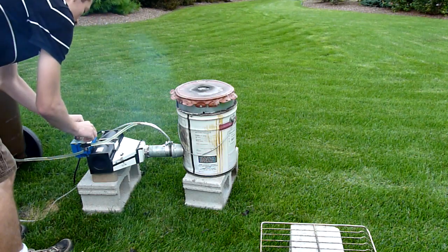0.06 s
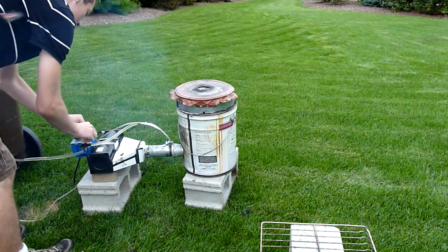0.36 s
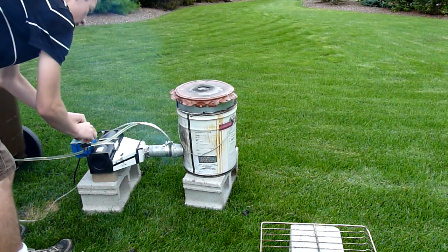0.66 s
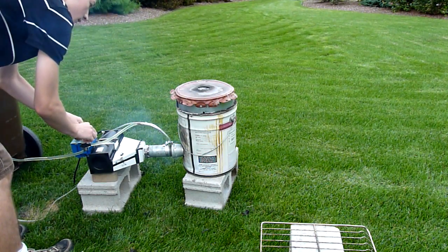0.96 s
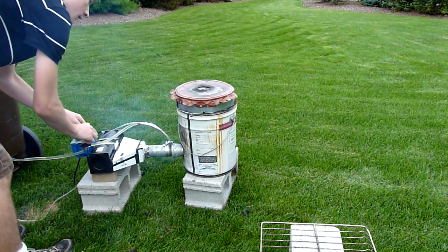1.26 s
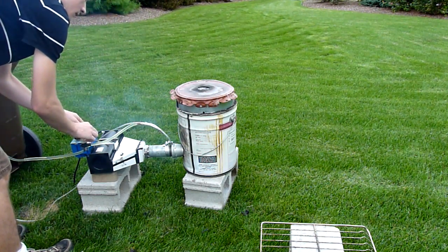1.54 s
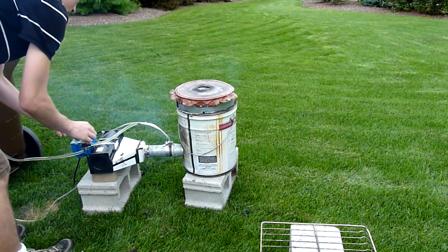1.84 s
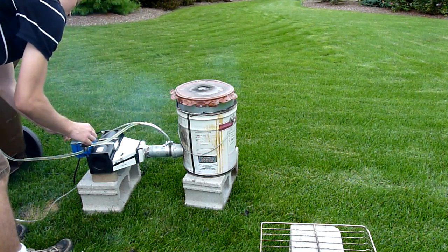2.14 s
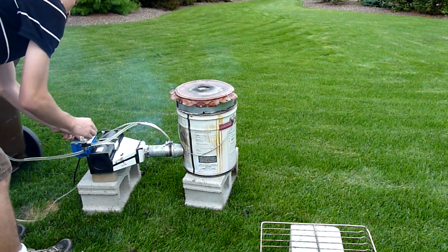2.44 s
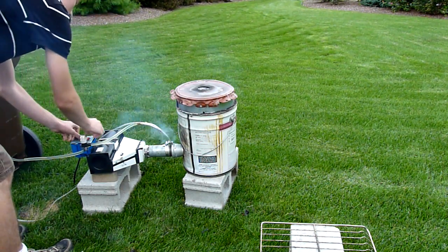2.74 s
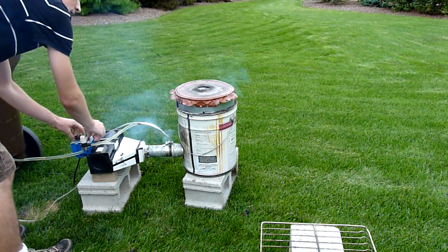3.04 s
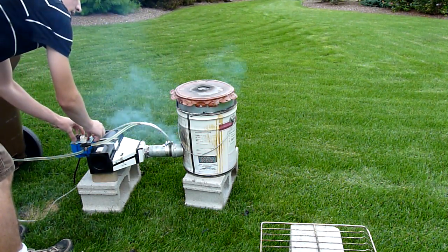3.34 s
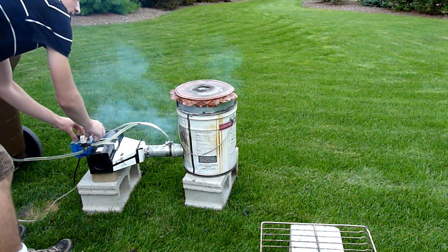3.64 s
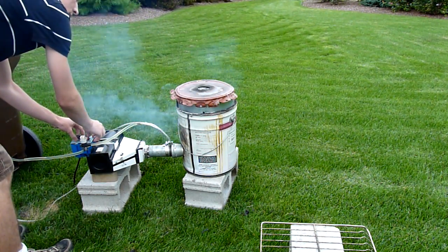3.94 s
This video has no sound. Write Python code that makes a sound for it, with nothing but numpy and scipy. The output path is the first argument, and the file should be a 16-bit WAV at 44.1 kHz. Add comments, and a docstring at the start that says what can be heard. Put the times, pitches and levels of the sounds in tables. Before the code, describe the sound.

A burner flame flutters in uneven low surges inside a small furnace, over a blower's steady rush and a spitting hiss. Fuel catches with two separate hard thumps, then three in quick succession. Heard outdoors from a couple of metres.

```python
"""A blower-fed burner fires into a small home-made furnace on a lawn, a couple of metres away.
From the start the flame flutters in uneven low surges over the blower's steady rush, while the air
tube rings hollowly and the nozzle hisses and spits. Pockets of fuel catch with a hard thump at 1.2 s
and again near 1.9 s, where the surges peak; the flame eases, then thumps three times around 3.4 s.
Throughout, the recorder adds a faint ring at 3-4 kHz and cuts three narrow bands out of the sound."""
import sys
import numpy as np
from scipy import signal
from scipy.fft import rfft, irfft
from scipy.io import wavfile
from scipy.ndimage import uniform_filter1d, map_coordinates

SR = 44100
rng = np.random.default_rng(int(sys.argv[2]) if len(sys.argv) > 2 else 0)


def materialize(psi):
    """Save the field psi as 16-bit PCM at rate SR to the path in sys.argv[1].

    A 1-D psi becomes a single channel; in a 2-D psi each row is a channel.
    """
    bounded = np.clip(np.atleast_2d(psi).T, -1, 1)
    quanta = np.round(bounded * 32767).astype(np.int16)
    wavfile.write(sys.argv[1], SR, quanta)


N = 176400
TIME = np.arange(N) / SR
FREQS = np.arange(N // 2 + 1) * SR / N

# resonances of the blower housing (centre [Hz], width [Hz], boost [dB])
HOUSING_MODES = [(1346, 26, 7), (1395, 100, 5), (1585, 50, 5), (2175, 100, 7), (2340, 70, 4),
                 (5360, 150, 4), (5560, 80, 5), (6640, 170, 5)]


def undb(db):
    """Decibels to gain."""
    return 10 ** (np.asarray(db) / 20)


def ride(points):
    """A fader ride: straight lines in dB between (time, level) points."""
    return np.interp(TIME, *np.array(points).T)


def walk(rate):
    """Smooth random wobble of spread 1 that changes about rate times a second."""
    y = map_coordinates(rng.standard_normal(N // 20), [TIME * rate], order=3, mode="wrap")
    return y / y.std()


def resonances(peaks):
    """Boost in dB that a set of resonances gives at each frequency."""
    return sum(db / (1 + (2 * (FREQS - hz) / width) ** 2) for hz, width, db in peaks)


def noise(spectrum, peaks=()):
    """Noise of rms 1 with a smooth spectrum and resonances on top."""
    f = FREQS + 1e-6
    hz, db = np.array(spectrum, float).T
    colour = undb(np.interp(np.log(f), np.log(hz), db) + resonances(peaks))
    roll_off = np.minimum(f / hz[0], 1) ** 2 * np.minimum(hz[-1] / f, 1) ** 2
    y = irfft(rfft(rng.standard_normal(N)) * colour * roll_off, N)
    return y / y.std()


def band(hz, width_hz, size=N):
    """Two unrelated noises of rms 1 in a bell-shaped band."""
    f = np.arange(size // 2 + 1) * SR / size
    bell = 1 / (1 + (1.4 * (f - hz) / width_hz) ** 2)
    y = irfft(rfft(rng.standard_normal((2, size))) * bell, size)
    return y / y.std()


def puffs(table):
    """Short swells of hiss, each in its own band, as two unrelated signals."""
    size = 8192
    out = np.zeros((2, N + 2 * size))
    t = (np.arange(size) - size // 2) / SR
    for at, length, hz, width, db in table:
        start = int(at * SR) + size // 2
        out[:, start:start + size] += undb(db) * band(hz, width, size) * np.exp(-2 * (t / length) ** 2)
    return out[:, size:size + N]


def spread(mid, side):
    """Left and right from mid and side."""
    return np.array([mid + side, mid - side])


def ports(mid, side, likeness):
    """Hiss is only partly alike at the two ports, louder and a trace later on the left."""
    pan_db, lag_s = 5.5, 1.7e-5
    left, right = spread(np.sqrt((1 + likeness) / 2) * mid, np.sqrt((1 - likeness) / 2) * side)
    left = irfft(rfft(left) * np.exp(-2j * np.pi * FREQS * lag_s), N)
    return np.array([left * undb(pan_db / 2), right * undb(-pan_db / 2)])


def blower():
    """The bed: air rushes evenly through the ringing housing, with a light flutter."""
    # tone of the rush in the centre (frequency [Hz], relative level [dB])
    mid_spectrum = [(60, 14.5), (200, -14), (450, 6), (545, 1), (640, 5), (950, 2.5), (1200, -3.5),
                    (1550, -6.5), (1720, -10), (2000, -12), (2350, -12.5), (3000, -19.5), (4300, -14.5),
                    (5400, -10.5), (6300, -11.5), (7500, -17), (9000, -17), (15500, -31)]
    # tone of the diffuse air that gives it width (frequency [Hz], relative level [dB])
    side_spectrum = [(20, -5), (60, -5), (130, -17), (280, -7), (600, -3.5), (1000, -1.5), (1500, -3.5),
                     (2100, -9), (3000, -7), (4200, -6.5), (5400, -16), (6500, -16), (8000, -15)]
    # slow drift of the rush (time [s], gain [dB])
    drift = [(0, -1), (.8, 1), (1.25, -0.5), (1.45, 1), (1.9, 0), (2.05, 0), (2.8, 0), (3.2, 0.5), (4, 1.5)]
    flutter_db, flutter_hz = 1.3, 21.78
    air = spread(undb(-44.5) * noise(mid_spectrum, HOUSING_MODES), undb(-59) * noise(side_spectrum))
    return air * undb(ride(drift) + flutter_db * walk(flutter_hz))


def air_tube():
    """The air tube's resonances give a hollow ring that swells and fades."""
    # resonances of the tube (centre [Hz], width [Hz], relative level [dB])
    modes = [(1357, 92, -3), (1423, 77, -5), (1565, 110, -4.5)]
    # swell of the ring (time [s], level [dB])
    swell = [(0, -56.5), (.35, -52.5), (.56, -59), (.95, -55), (1.07, -49), (1.25, -58.5), (1.42, -49),
             (1.72, -57), (1.86, -49), (2.05, -62.5), (3.3, -58.5), (3.68, -54.5), (4, -59)]
    ring = sum(undb(db) * band(hz, width)[0] for hz, width, db in modes)
    return ring / ring.std() * undb(ride(swell))


def sizzles():
    """A fine fry at the nozzle: tiny puffs scattered in time, pitch and level."""
    per_s, length_s, width_hz = 100, .02, 300
    low_hz, high_hz, typical_db, scatter_db = 9000, 15500, -59, 5
    when, pitch, strength = rng.random((int(per_s * N / SR), 3)).T
    centres = low_hz + pitch * (high_hz - low_hz)
    levels = typical_db + scatter_db * (2 * strength - 1)
    return puffs((at, length_s, hz, width_hz, db) for at, hz, db in zip(when * N / SR, centres, levels))


def nozzle():
    """The top end: the jet's flickering hiss, wavering whistles and sputtering spurts."""
    # tone of the steady hiss (frequency [Hz], relative level [dB])
    hiss_spectrum = [(2000, -28), (3300, -9.5), (4100, -8), (4800, -40), (6200, -8.5), (7200, -8.5),
                     (8300, -6), (9100, -6.5), (10200, -6), (11500, -2), (12300, -5.5), (12900, 2.5),
                     (13700, 1), (15500, -3.5)]
    # faint ringing at 3-4 kHz, maybe the recorder's own noise, and higher peaks; all of them ring in the hiss
    # and its spurts (centre [Hz], width [Hz], boost [dB])
    peaks = [(3120, 90, 6), (3674, 60, 10), (3808, 55, 10), (4026, 55, 10), (7200, 200, 6), (8637, 80, 5),
             (9060, 130, 5), (9786, 130, 8), (10309, 80, 4), (10600, 150, 5), (11430, 80, 5),
             (12900, 120, 3), (13600, 150, 3), (14658, 60, 4)]
    # drift and brief dips of the hiss (time [s], gain [dB])
    drift = [(0, 0.5), (.49, 1), (.53, 1), (.57, 0.5), (2.6, 2), (2.745, 1), (2.775, -3), (2.87, 0.5),
             (2.99, 1.5), (3.04, -1.5), (3.1, 1.5), (3.55, 2), (4, -0.5)]
    # a faint whistling edge that holds, then dies away (time [s], level [dB])
    edge_fade = [(0, -60), (1.6, -57.5), (4, -97)]
    # faint whistles of the jet (centre [Hz], width [Hz], level [dB])
    whistle_bands = [(6620, 130, -65.5), (9950, 120, -66), (10660, 160, -64.5)]
    # spurts of hiss (time [s], length [s], centre [Hz], width [Hz], relative level [dB])
    spurt_cues = [(.217, 0.015, 12600, 5000, -40), (.22, .02, 6200, 2000, -46.5),
                  (.47, 0.037, 12000, 4000, -47), (.51, 0.035, 5500, 4000, -50),
                  (.757, 0.032, 11400, 1100, -41.5), (.877, 0.016, 13200, 2500, -40),
                  (.99, .012, 12500, 4000, -52), (1.035, 0.0097, 11100, 4000, -42),
                  (1.094, .028, 11400, 1000, -47), (1.15, .03, 14400, 1300, -46),
                  (1.441, 0.016, 12500, 4000, -42), (1.498, 0.018, 11200, 1300, -45),
                  (1.519, 0.02, 13600, 3200, -40), (1.594, 0.016, 13000, 4500, -43),
                  (1.70, 0.02, 13800, 1500, -42), (1.92, 0.096, 6400, 1700, -50),
                  (1.95, 0.017, 11600, 1800, -42), (2.012, 0.02, 13000, 3500, -42.5),
                  (2.10, 0.027, 11200, 700, -47), (2.31, .012, 13500, 4000, -41),
                  (2.345, .035, 14800, 1800, -45), (2.378, 0.016, 10600, 700, -48.5),
                  (2.348, 0.04, 11400, 800, -45), (2.531, 0.02, 13700, 1800, -39.5),
                  (2.59, 0.024, 14200, 2500, -41), (2.645, 0.03, 9700, 1200, -50),
                  (2.738, .022, 13000, 4000, -44), (3.09, 0.031, 14200, 1500, -40),
                  (3.486, 0.018, 14200, 2000, -40), (3.58, 0.035, 8300, 4000, -48),
                  (3.755, 0.03, 12500, 4040, -45)]
    flicker_db, flicker_hz = 1.45, 60
    waver_db, waver_hz = 2.5, 14
    spurt_gain_db, sputter_db, sputter_hz, spurt_colour = -4, 2.5, 157.6, .81
    flow = undb(ride(drift) + flicker_db * walk(flicker_hz))
    hiss = undb(-48.5) * ports(noise(hiss_spectrum, peaks), noise(hiss_spectrum, peaks), likeness=.32)
    edge = band(hz=9170, width_hz=260) * undb(ride(edge_fade) + waver_db * walk(waver_hz))
    whistles = sum(band(hz, width) * undb(db + waver_db * walk(waver_hz))
                   for hz, width, db in whistle_bands)
    spurts = puffs(spurt_cues) * undb(spurt_gain_db + sputter_db * walk(sputter_hz))
    spurts = irfft(rfft(spurts) * undb(spurt_colour * resonances(peaks)), N)
    accents = edge + spurts + flow * (sizzles() + whistles)
    return flow * hiss + ports(*accents, likeness=.96)


def roar(spectrum, peaks=()):
    """Flame noise levelled to an even rms of 1, so the surges alone set its dynamics."""
    y = noise(spectrum, peaks)
    power = uniform_filter1d(uniform_filter1d(y ** 2, size=500), size=500)
    y = y / np.sqrt(power)
    return y / y.std()


def flame():
    """Turbulent burning: a boom that surges and sinks back, and a rasp that bites on strong surges."""
    # surges of the flame (time [s], length [s], relative level [dB])
    surges = [(.027,0.039,-33),(.142,0.018,-33.5),(.187,0.035,-28.5),(.34,0.04,-33),(.477,0.027,-30),(.603,0.035,-28.5),(.69,0.15,-39),(.733,0.034,-28),(.789,0.026,-26.5),(.856,0.045,-28),(.929,0.028,-30),(.983,0.036,-31.5),(1.055,0.061,-27.5),(1.135,0.038,-24),(1.2,0.044,-28),(1.26,0.017,-34),(1.315,0.069,-35),(1.35,1.3,-41),(1.403,0.036,-25),(1.474,0.063,-25.5),(1.556,0.047,-25),(1.656,0.11,-33),(1.729,0.17,-36.5),(1.832,0.039,-24),(1.888,0.027,-23),(1.918,0.026,-21),(1.943,0.011,-20),(1.993,0.046,-26),(2.086,0.033,-27),(2.195,0.039,-27),(2.271,0.032,-35),(2.323,0.046,-28.5),(2.458,0.06,-32),(2.529,0.016,-30),(2.573,0.03,-26.5),(2.698,0.035,-33.5),(2.735,0.029,-32),(2.885,0.013,-36.5),(2.989,0.034,-29),(3.156,0.02,-28),(3.232,0.019,-29.5),(3.272,0.043,-33),(3.36,0.042,-30.5),(3.447,0.034,-24),(3.495,0.049,-37.5),(3.582,0.041,-29.5),(3.641,0.032,-29.5),(3.692,0.027,-25),(3.735,0.036,-28.5),(3.793,0.044,-28),(3.866,0.06,-31),(3.927,0.041,-33),(3.985,0.087,-35)]
    # tone of the low boom (frequency [Hz], relative level [dB])
    boom_spectrum = [(20, -28), (40, -31), (65, -7.5), (95, 0), (195, -1.5), (230, -12), (330, -17.5),
                     (480, -39)]
    # tone of the brighter rasp (frequency [Hz], relative level [dB])
    rasp_spectrum = [(150, -4.5), (255, 2), (310, 0.5), (380, -5), (460, -7), (545, -25), (680, -19),
                     (1100, -24.5), (1500, -31.5), (1800, -30), (2100, -39.5), (3000, -41)]
    # weight of the deepest rumble within the boom (time [s], gain [dB])
    sub_weight = [(0, 4.5), (.8, -0.5), (1.25, 4), (1.55, -10), (1.95, -8), (2.15, -5), (2.6, 1),
                  (3.3, 0.5), (3.9, -4.5)]
    floor_db, typical_db, boom_gain_db, rasp_gain_db = -45.5, -28.5, -1, -7
    sub_hz, rasp_growth = 91, 1.39
    steepness = 2.38  # of a surge's flanks: 2 is a bell, more is squarer
    power = undb(floor_db) ** 2
    for at, length, db in surges:
        flank = np.abs(2 * (TIME - at) / length) ** steepness
        power += undb(db) ** 2 * np.exp(-np.minimum(flank, 20))
    strength = np.sqrt(power)
    boom = undb(boom_gain_db) * strength * roar(boom_spectrum)
    sub = signal.sosfiltfilt(signal.butter(2, sub_hz, fs=SR, output="sos"), boom)
    boom += sub * (undb(ride(sub_weight)) - 1)
    bite = (strength / undb(typical_db)) ** rasp_growth
    rasp = undb(typical_db + rasp_gain_db) * bite * roar(rasp_spectrum, HOUSING_MODES)
    return boom + rasp


def thumps():
    """A pocket of fuel catches at once and pushes out a short pressure wave."""
    # hard thumps of the flame (time [s], pitch [Hz], peak [dB])
    hits = [(1.223, 143, -19), (1.855, 150, -16), (3.333, 150, -19.5), (3.4425, 130, -11.5),
            (3.525, 153, -15.5)]
    half_width_cycles = .75
    out = np.zeros(N)
    for at, hz, db in hits:
        cycles = (TIME - at) * hz
        envelope = np.exp(-np.minimum((cycles / half_width_cycles) ** 2, 20))
        out += undb(db) * np.cos(2 * np.pi * cycles) * envelope
    return out


def scene():
    """The burner in the open air, with no echo."""
    channel_gain = undb([[-.125], [.125]])  # the recorder's right channel is a hair louder
    return (flame() + thumps() + air_tube()) * channel_gain + blower() + nozzle()


def record(dry):
    """The recorder notches narrow bands out, the highest only partly, and cuts the top."""
    # deep cuts, the upper two merging into one band (centre [Hz], width [Hz])
    notches = [(2595, 355), (4520, 234), (4650, 167)]
    soft_share, top_hz = .92, 15600

    def notch(x, hz, width_hz):
        return signal.lfilter(*signal.iirnotch(hz, hz / width_hz, fs=SR), x)

    for hz, width in notches:
        dry = notch(notch(dry, hz, width), hz, width)
    dry = dry + soft_share * (notch(dry, hz=7905, width_hz=490) - dry)
    return signal.sosfilt(signal.ellip(12, .2, 80, top_hz, fs=SR, output="sos"), dry)


dry = scene()
out = record(dry)
materialize(out)
```